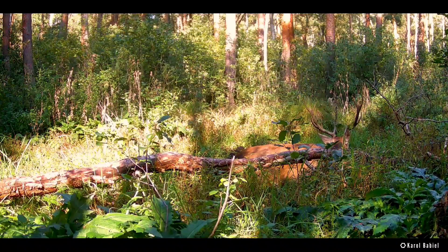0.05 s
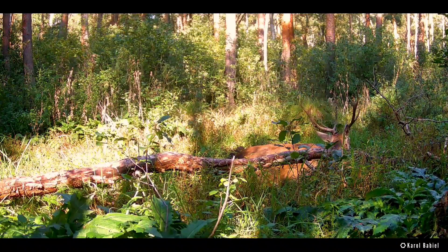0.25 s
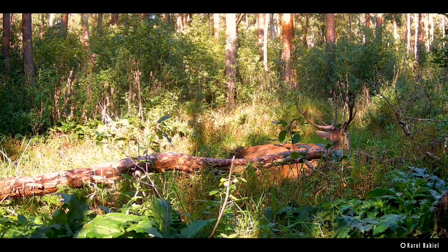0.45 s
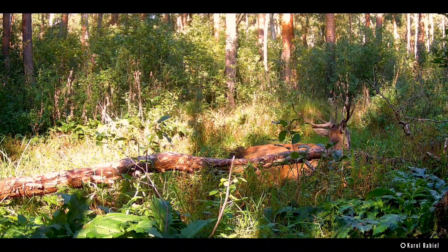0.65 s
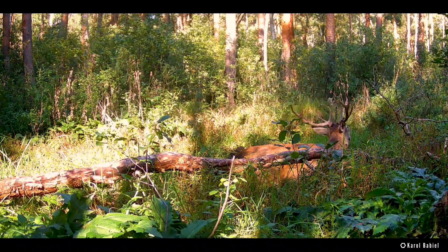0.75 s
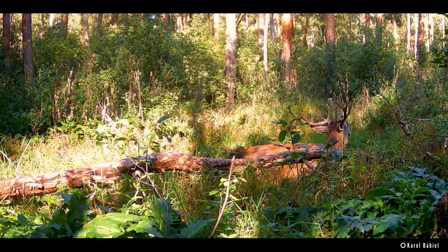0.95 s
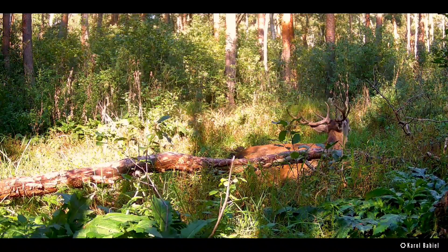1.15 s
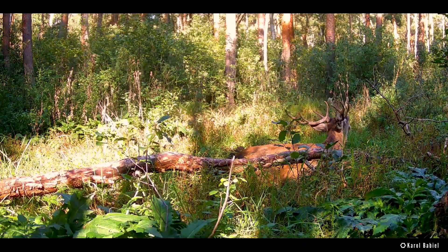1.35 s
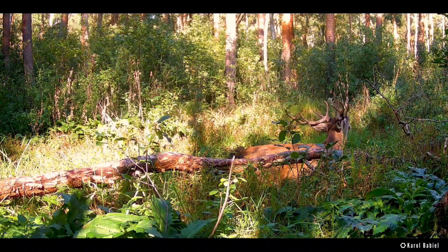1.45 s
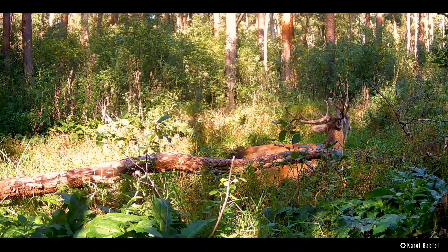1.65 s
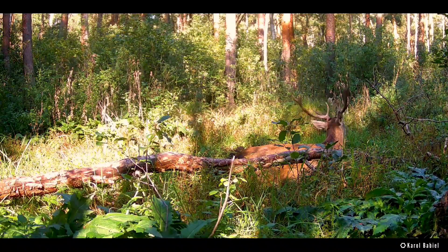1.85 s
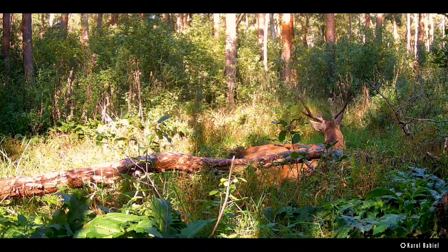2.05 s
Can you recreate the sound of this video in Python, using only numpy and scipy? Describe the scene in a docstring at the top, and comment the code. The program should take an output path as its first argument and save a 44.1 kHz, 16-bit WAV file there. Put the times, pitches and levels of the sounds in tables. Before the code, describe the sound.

A red deer stag starts one long, low, hoarse roar at about 0.2 seconds. Its pitch climbs slightly until around 1.2 seconds while the tone grows hollower, then it sinks and ends raspily at 1.8 seconds, leaving a faint forest echo. A distant small bird gives a few thin, high chirps from 1.7 to 2.1 seconds. Soft hiss and rumble of air continue throughout.

```python
"""One long, hoarse roar of a red deer stag fills a forest clearing. His vocal folds are the source and
his throat is the filter: he pulls his larynx down as he calls, so the resonances of the lengthening
throat slide down through the harmonics of the voice. The trees answer faintly, a small bird calls
far off as the roar ends, and the air rumbles and hisses softly throughout."""
import sys
import numpy as np
from scipy import signal
from scipy.fft import rfft, irfft, next_fast_len
from scipy.io import wavfile
from scipy.ndimage import map_coordinates

SR = 44100
rng = np.random.default_rng(int(sys.argv[2]) if len(sys.argv) > 2 else 0)


def master(y):
    """Save y as 16-bit WAV."""
    cut = np.clip(np.atleast_2d(y).T, -1, 1)
    pcm = np.round(cut * 32767)  # scale
    wavfile.write(sys.argv[1], SR, pcm.astype(np.int16))


N = 92610
TIME = np.arange(N) / SR


def amp(db):
    return 10 ** (np.asarray(db) / 20)


def unit_rms(x):
    return x / np.sqrt(np.mean(x ** 2) + 1e-20)


def along(points, hz):
    """Interpolation of (Hz, value) points on a logarithmic frequency axis."""
    f, v = np.transpose(points)
    return np.interp(np.log(hz + 1), np.log(f + 1), v)


def curves(rows, t):
    """Linear interpolation of each column after the first at the times t."""
    times, *columns = np.transpose(rows)
    return [np.interp(t, times, column) for column in columns]


def wobble(rate, t):
    """A smooth random curve with rate knots a second."""
    return map_coordinates(rng.standard_normal(int(N * rate / SR) + 4), [t * rate], mode="nearest")


def filtered(x, response):
    """Linear filtering: the spectrum of x times a frequency response."""
    size = next_fast_len(N + 8192)
    return irfft(rfft(x, size) * response(np.fft.rfftfreq(size, 1 / SR)), size)[:N]


def minimum_phase(points, hz):
    """Complex causal gain of a (Hz, dB) spectrum, by folding its cepstrum."""
    grid = np.fft.rfftfreq(4096, 1 / SR)
    cepstrum = irfft(np.log(amp(along(points, grid))))
    cepstrum[1:len(grid) - 1] *= 2
    cepstrum[len(grid):] = 0
    return np.exp(np.interp(hz, grid, rfft(cepstrum)))


# Spectrum of the still air. Each row: frequency in Hz, relative spectral density in dB.
AIR_SPECTRUM = [(20, -4.5), (27, -2), (50, -7), (80, -12.5), (150, -13.5), (200, -15.5), (264, -23),
                (495, -21), (670, -29.5), (820, -26), (1160, -32), (1570, -33), (2500, -36), (3300, -43),
                (4970, -55), (6500, -49), (8000, -46), (10400, -72)]
AIR_DB, RUMBLE_SWAY_DB, RUMBLE_BELOW_HZ = -42.5, 1, 120


def air():
    """Coloured noise: a steady faint hiss over a rumble whose amplitude is gently modulated."""
    noise = unit_rms(filtered(rng.standard_normal(N), lambda hz: amp(along(AIR_SPECTRUM, hz))))
    rumble = filtered(noise, lambda hz: hz < RUMBLE_BELOW_HZ)
    hiss = noise - rumble
    return amp(AIR_DB) * (hiss + rumble * amp(RUMBLE_SWAY_DB * wobble(9, TIME)))


# Reverberation of the forest. Each row: frequency in Hz, time to fall 60 dB in seconds.
DECAY_TIMES = [(150, 0.87), (500, 0.87), (1000, .8), (4000, 0.59)]
# Echo of the roar, strongest in the treble. Each row: frequency in Hz, gain in dB.
ROAR_ECHO = [(100, -24.5), (200, -19.5), (400, -28.5), (650, -21.5), (950, -8), (2000, -4.5), (4000, -7.5)]
BIRD_ECHO_DB = -5


def forest_echo(roar, song):
    """Diffuse reverberation: the trees scatter sound, and each frequency decays at its own rate."""
    scattered = filtered(roar, lambda hz: amp(along(ROAR_ECHO, hz))) + amp(BIRD_ECHO_DB) * song
    hz, t, noise = signal.stft(rng.standard_normal(SR), SR, nperseg=256)
    decay = amp(-60 * t / along(DECAY_TIMES, hz)[:, None])
    tail = signal.istft(noise * decay, SR, nperseg=256)[1]
    return signal.fftconvolve(scattered, tail / np.linalg.norm(tail))[:N]


# Bird notes. Each row: start and length in seconds, first and last pitch in Hz, level in dB.
BIRD_NOTES = [(1.718, .055, 7100, 7400, -64), (1.764, 0.057, 7420, 7530, -58),
              (1.822, 0.086, 7720, 7670, -62.5), (2.055, .04, 7100, 7650, -60.5),
              (2.086, .05, 6560, 7180, -55.5)]
WARBLE_HZ, WARBLE_DEPTH_HZ = 32, 80


def bird():
    """Frequency modulation: thin whistles, most of them rising, carry a quick warble."""
    song = np.zeros(N)
    for start, length, first, last, db in BIRD_NOTES:
        progress = np.clip((TIME - start) / length, 0, 1)
        warble = WARBLE_DEPTH_HZ * np.sin(2 * np.pi * WARBLE_HZ * (TIME - start))
        hz = first + (last - first) * progress + warble
        envelope = amp(db + 2.5 * wobble(120, TIME)) * np.sqrt(np.abs(np.sin(np.pi * progress)))
        song += envelope * np.sin(2 * np.pi * np.cumsum(hz) / SR)
    return song


# Spectrum of one pulse of the folds. Each row: frequency in Hz, relative level in dB.
PULSE_SPECTRUM = [(100.0, -29.5), (200.0, -30.5), (350.0, -30.5), (550.0, -48), (750.0, -56), (1100.0, -73),
                  (2000.0, -85), (3000.0, -92), (4000.0, -92.5)]
# Vocal effort. Each row: time in seconds, gain in dB, tilt about 300 Hz in dB per octave.
VOCAL_EFFORT = [(0.16, -12.5, -6), (0.22, -3.5, 0.6), (0.28, -1.8, 2.6), (0.35, -0.2, 1.7),
                (0.41, 1.3, 0.8), (0.48, -2, 2.2), (0.57, -2, 0.9), (0.7, -1.84, 1.5), (0.85, -0.7, 1.2),
                (0.95, -1.1, 3.4), (1.0, 1.3, 0.7), (1.05, 0.5, 1.04), (1.28, 1, 0.25), (1.52, 1.85, 1.55),
                (1.61, 0.1, 1.9), (1.67, -1, 1.51), (1.74, 0, 0.9), (1.8, -1.5, -0.6)]
# Throat shape. Each row: time in seconds, larynx height (1 raised, 0 down), mouth shape (0 neutral).
THROAT_SHAPE = [(0.16, 2.4, 0.29), (0.22, 0.94, 0.71), (0.28, 0.84, 0.45), (0.35, 0.77, 0.25),
                (0.41, 0.74, -0.2), (0.48, 0.65, -1.3), (0.57, 0.46, 0.26), (0.7, 0.52, -0.056),
                (0.85, 0.2, 0.73), (0.95, 0.17, 0.19), (1.0, 0.12, 0.32), (1.05, 0.11, -0.13),
                (1.28, 0.08, -0.073), (1.52, 0.12, -0.34), (1.61, -0.0034, -0.033), (1.67, 0.01, 0.41),
                (1.74, 0.021, 0.61), (1.8, 0.04, -0.18)]
# Throat resonances. Each row: centre in Hz with the larynx raised, the same with it down,
# width in Hz, gain in dB, shift in Hz per unit of mouth shape.
RESONANCES = [(202.3, 195, 18.6, 12, 0), (741, 498.7, 31.7, 19.5, 93), (1107, 862, 20.5, 21, -22),
              (1213, 965.7, 36.4, 19.5, -15.5), (1696, 1152, 86, 15, -47), (1923, 1419, 41, 23, 5.5),
              (2453, 1830, 71, 23, 17.5), (2566, 2385, 37, 20.5, 0.5), (3500, 3330, 95, 17.5, 0)]
# Hollows between the resonances. Each row reads as above.
ANTIRESONANCES = [(627, 436, 46, -11.5, -54), (830, 560, 14, -12.5, 1), (986, 690, 246, -18, 2.5),
                  (1360, 1100, 46, -5, -3.5), (2250, 2180, 200, -9.5, 1)]
# The strongest resonance follows its own path. Each row: time in seconds, centre in Hz.
MAIN_RESONANCE = [(.22, 479), (.28, 431), (.35, 421), (.41, 402), (.48, 372), (.7, 356.3), (.85, 344.3),
                  (.985, 344), (1.05, 333.4), (1.28, 332.7), (1.52, 327.5), (1.61, 329), (1.66, 340),
                  (1.74, 340.9), (1.8, 341)]
MAIN_WIDTH_HZ, MAIN_DB, VOICE_DB = 28.4, 17.5, 0.35


def throat(hz, t):
    """Tube resonance: formants fall as the throat lengthens, shaping a pulse spectrum tilted by effort."""
    height, mouth = curves(THROAT_SHAPE, t)
    effort_db, tilt = curves(VOCAL_EFFORT, t)
    octaves = np.log2(np.maximum(hz, 50) / 300)
    gain = minimum_phase(PULSE_SPECTRUM, hz) * amp(VOICE_DB + effort_db + tilt * octaves)
    sliding = [(down + (raised - down) * height + shift * mouth, width, db)
               for raised, down, width, db, shift in [*RESONANCES, *ANTIRESONANCES]]
    sliding.append((curves(MAIN_RESONANCE, t)[0], MAIN_WIDTH_HZ, MAIN_DB))
    for centre, width, db in sliding:
        detune = centre ** 2 - hz ** 2
        gain = gain * (detune + 1j * hz * width * amp(db)) / (detune + 1j * hz * width)
    return gain


FLUTTER_DB, SCATTER_RAD, SCATTER_FULL_HZ = 2.5, 1.1, 910


def voice(pitch, phase, harmonics):
    """Harmonic series: nearly periodic pulses of the folds sound through the throat."""
    hop = 64  # samples between updates of the gains
    frames = TIME[::hop]
    hz = np.arange(1, harmonics + 1)[:, None] * pitch[::hop]
    # The upper harmonics flicker in level, and paths through the foliage blur their phases.
    depth = np.minimum(hz / SCATTER_FULL_HZ, 1) ** 2
    flutter = depth * np.array([wobble(16, frames) for _ in hz])
    blur = depth * np.array([wobble(3, frames) for _ in hz])
    gains = throat(hz, frames) * amp(FLUTTER_DB * flutter) * np.exp(1j * SCATTER_RAD * blur)
    phasor, stack = np.exp(1j * phase), 0
    for gain in gains[::-1]:  # harmonics summed from the top down
        stack = (stack + np.interp(TIME, frames, gain)) * phasor
    return -stack.real


# Hoarseness. Each row: time in seconds, gain of the rasp in dB.
HOARSENESS = [(.16, -9.5), (.3, -12.5), (.6, -16.5), (.95, -14.5), (1.25, -20.5), (1.5, -17.5), (1.65, -13),
              (1.8, -1.5)]
# Colour of the rasp against the pulse. Each row: frequency in Hz, gain in dB.
RASP_SPECTRUM = [(100, -20.5), (400, -28), (800, -8.5), (1500, 2), (3000, 8), (4200, 4)]


def rasp(pitch, phase, harmonics):
    """Pitch-synchronous noise: one puff in each cycle of the folds, filtered by the throat."""
    puffs = unit_rms(rng.standard_normal(N) * (1 + np.cos(phase)) ** 4.5)
    puffs *= amp(curves(HOARSENESS, TIME)[0])
    hz, frames, spectra = signal.stft(puffs, SR, nperseg=1024)
    hz = hz[:, None]
    colour = throat(hz, frames) * amp(along(RASP_SPECTRUM, hz)) * (hz < harmonics * pitch.max())
    per_harmonic = np.sqrt(SR / pitch) / 2  # puts the noise on the power scale of the harmonics
    return signal.istft(spectra * colour, SR, nperseg=1024)[1][:N] * per_harmonic


# Vibration of the vocal folds. Each row: time in seconds, fundamental frequency in Hz.
FOLD_PITCH = [(0.155, 89.9), (0.2, 87.1), (0.26, 102.6), (0.33, 98.87), (0.4, 100.7), (0.52, 103.3),
              (0.65, 107.2), (0.8, 108.5), (0.9, 110.7), (1.04, 119.2), (1.15, 121.2), (1.28, 120.4),
              (1.45, 118.7), (1.56, 115.3), (1.62, 108.7), (1.69, 103.4), (1.76, 97.57), (1.82, 87.8)]
START_S, ATTACK_S, STOP_S, FALL_20_DB_S = 0.152, 0.012, 1.808, 0.015
JITTER_FRACTION, SHIMMER_DB = 0.0025, 0.27


def stag(harmonics=38):
    """Source and filter: the folds drive voice and rasp, with jitter in pitch and shimmer in level."""
    pitch = curves(FOLD_PITCH, TIME)[0] * (1 + JITTER_FRACTION * wobble(110, TIME))
    phase = 2 * np.pi * np.cumsum(pitch) / SR
    roar = voice(pitch, phase, harmonics) + rasp(pitch, phase, harmonics)
    attack = np.clip((TIME - START_S) / ATTACK_S, 0, 1)
    release = amp(-20 * np.maximum(TIME - STOP_S, 0) / FALL_20_DB_S)
    return roar * attack * release * amp(SHIMMER_DB * wobble(70, TIME))


def scene():
    """Superposition: the direct calls, their echo and the air add in one channel."""
    roar, song = stag(), bird()
    return (roar + song + forest_echo(roar, song) + air())[None]


# Roll-off of the treble and its mirror image. Each row: frequency in Hz, gain in dB.
TREBLE_ROLLOFF = [(7000, 0.5), (8000, -4.5), (8600, -8.5), (9300, -12), (10000, -31)]
LOW_RATE_HZ, BAND_LIMIT_HZ = 16000, 10000


def record(dry):
    """Spectral imaging: a low sampling rate mirrors the treble upward about half that rate."""
    band = filtered(dry[0], lambda hz: hz < LOW_RATE_HZ / 2)
    mirrored = band * (1 + 2 * np.cos(2 * np.pi * LOW_RATE_HZ * TIME))
    return filtered(mirrored, lambda hz: amp(along(TREBLE_ROLLOFF, hz)) * (hz < BAND_LIMIT_HZ))[None]


dry = scene()
out = record(dry)
master(out)
```